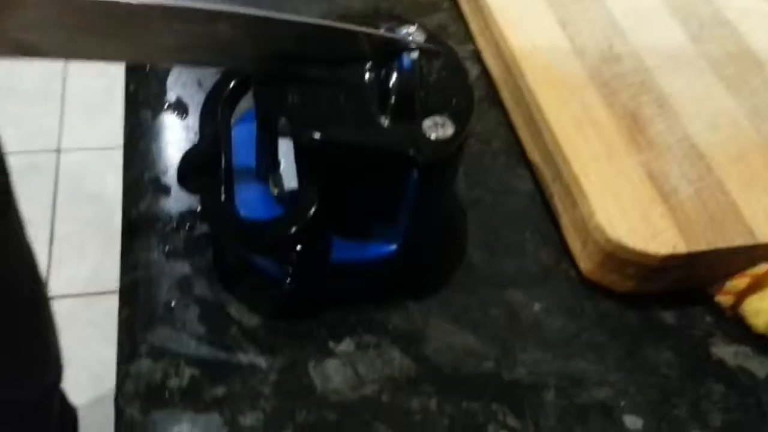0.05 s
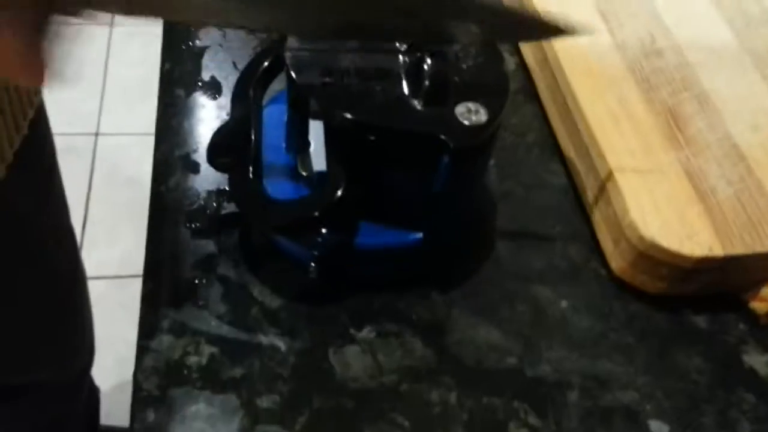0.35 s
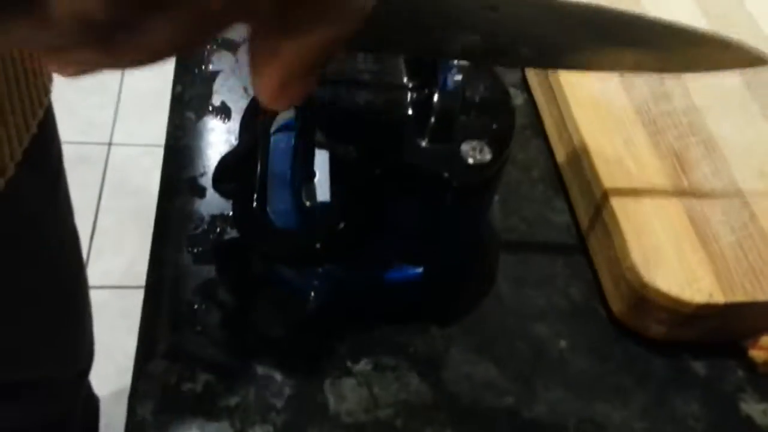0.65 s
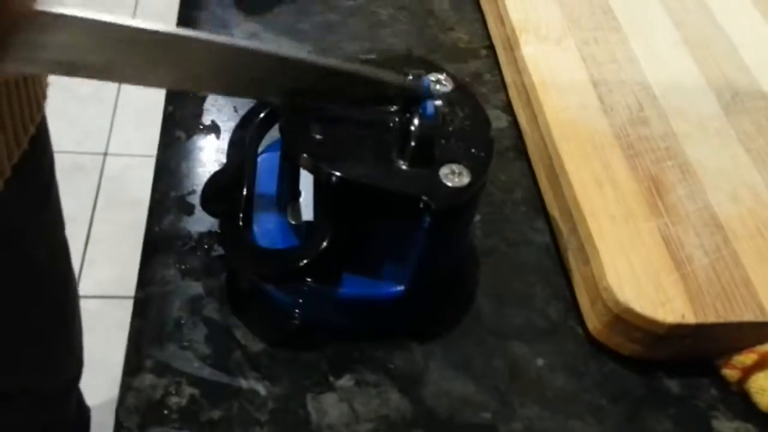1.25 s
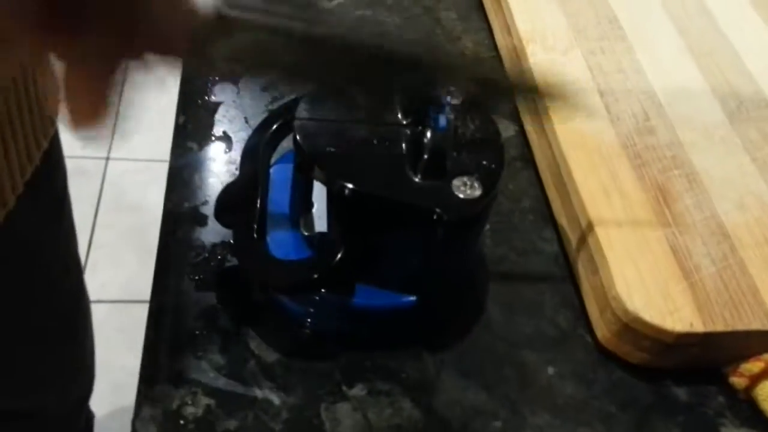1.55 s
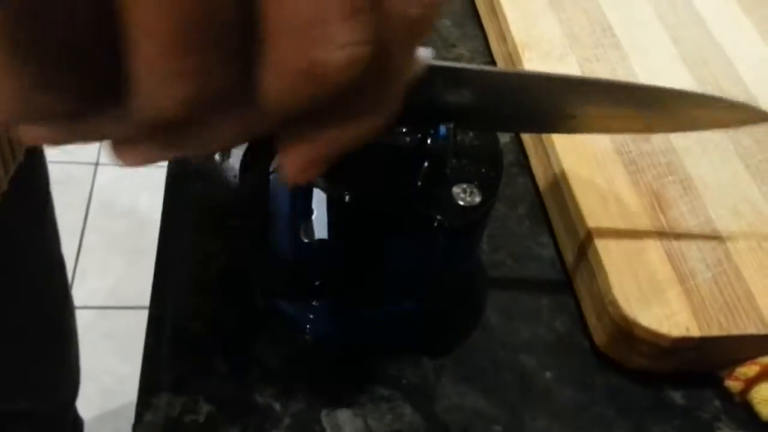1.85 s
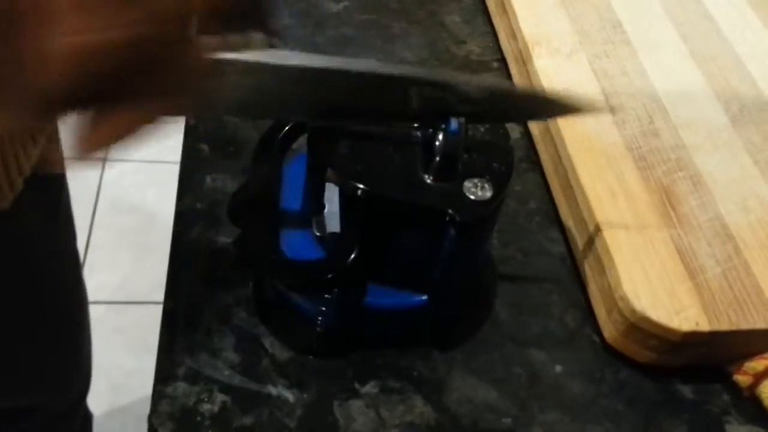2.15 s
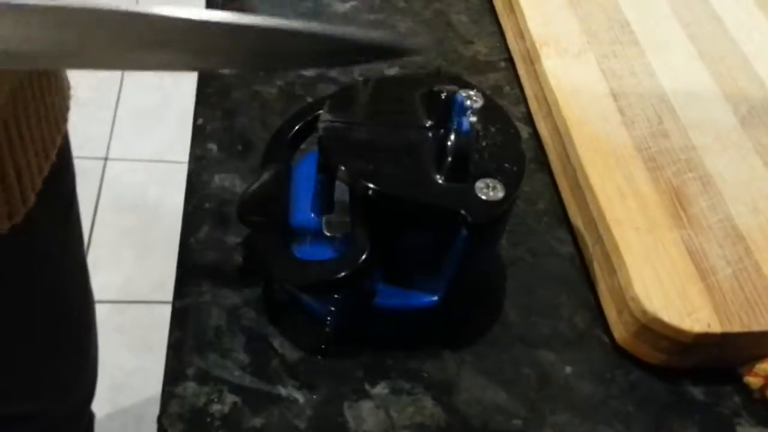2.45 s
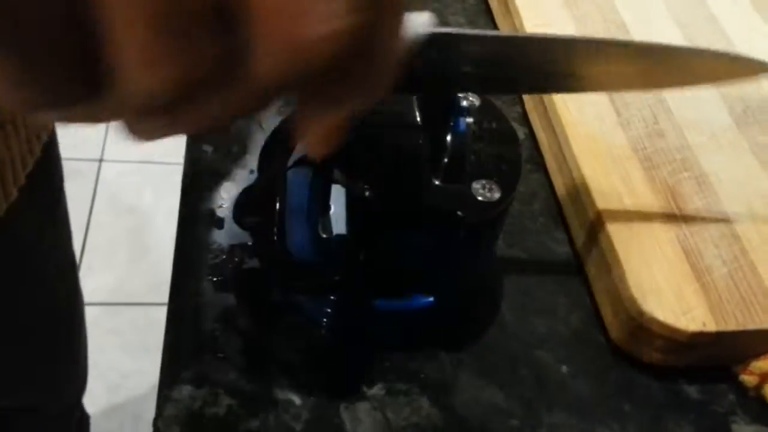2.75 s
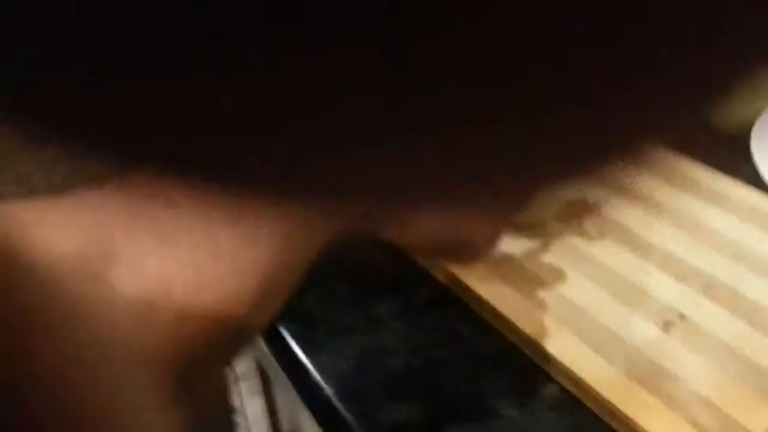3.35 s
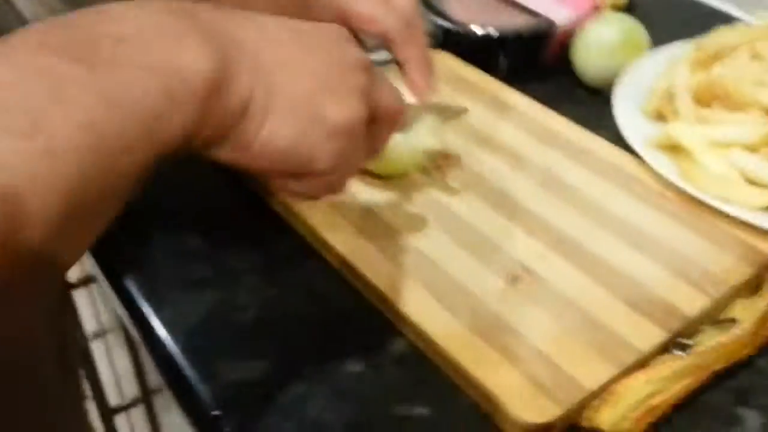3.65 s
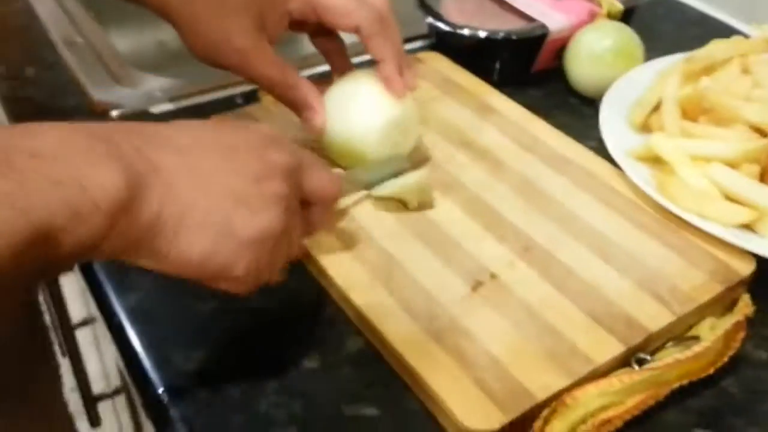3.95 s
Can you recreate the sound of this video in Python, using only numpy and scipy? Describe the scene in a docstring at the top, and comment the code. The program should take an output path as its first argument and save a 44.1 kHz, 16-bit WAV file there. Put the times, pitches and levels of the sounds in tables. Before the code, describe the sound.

Four rasping knife sharpener strokes with clicks and pings, followed by a short onion cut.

```python
"""In a small tiled kitchen, a knife is drawn four times through a sharpener on a stone counter.
Stick-slip friction of the gritty edge excites resonances of the hard teeth, plastic housing and blade;
between pulls the knife clicks into the slot, pings and slides lightly forward. Then it cuts an onion,
whose bursting cells crunch over the thud of a wooden board. The tiles reverberate over faint room noise."""
import sys
import numpy as np
from scipy import signal
from scipy.fft import rfft, irfft
from scipy.io import wavfile
from scipy.ndimage import uniform_filter1d, map_coordinates

SR = 44100
rng = np.random.default_rng(int(sys.argv[2]) if len(sys.argv) > 2 else 0)


def dump(signal):
    """Clip the signal to [-1, 1] and save it as 16-bit WAV at the path in sys.argv[1]."""
    limited = np.clip(np.atleast_2d(signal).T, -1, 1)
    pcm = np.round(limited * 32767).astype(np.int16)
    wavfile.write(sys.argv[1], SR, pcm)


N = 176400
TIME = np.arange(N) / SR


# Resonances of the three parts. Each row: frequency in Hz, width in Hz, relative level in dB.
TEETH_MODES = [(4965, 650, -3.5), (5390, 105, 2.5), (6260, 510, -0.5), (6510, 180, -1), (6770, 130, 3.5),
               (7200, 460, 1), (7800, 1100, -10), (8120, 73, -4.5), (8880, 590, -10), (10460, 1200, -15)]
HOUSING_MODES = [(105.6, 53, -18.5), (196, 41, -4.5), (408, 350, -12), (569, 134, -0.5), (730, 127, 3),
                 (905, 102, 4), (1095, 170, -1.5), (1263, 33, -4)]
BLADE_MODES = [(1580, 690, -0.5), (1880, 390, 0), (2220, 170, 2.5), (2480, 390, 0), (3015, 210, -1.5),
               (3630, 540, -6), (4205, 550, 3)]
# Band limits and mix of teeth, housing and blade. Each row: low and high filter cutoff in Hz, then in dB
# left minus right, room gain, rubbing gain, knock gain and the drop in force from belly to tip.
# The scraping hiss is filtered off steeply above about 11 kHz.
PART_MIX = [(4460, 10950, -20.5, -7.5, -0.5, 1, 7.5), (79, 2080, 0.5, -0.5, -3.5, 3.5, 0),
            (1220, 4030, 5.5, -0.5, -1.8, 0.5, 8.5)]
GRIT_PER_S, GRIT_SPREAD_DB, JUDDER_HZ, JUDDER_DB = 7000, 2, 330, 2.2

def sharpener():
    """Forced vibration: stick-slip friction and knocks drive the modes of teeth, housing and blade."""
    grit = grains(GRIT_PER_S, GRIT_SPREAD_DB)
    grit /= np.sqrt(uniform_filter1d(grit ** 2, size=1100) + 1e-9)  # the hand holds the pressure steady
    grit *= undb(JUDDER_DB * walk(JUDDER_HZ))  # the blade judders over the uneven edge
    cushion = signal.butter(2, 3450, fs=SR, output="sos")  # plastic softens knocks on housing and blade
    out = 0
    for part, modes in enumerate((TEETH_MODES, HOUSING_MODES, BLADE_MODES)):
        low_hz, high_hz, pan_db, room_db, rub_db, knock_db, tip_drop_db = PART_MIX[part]
        blows = knocks(part) if modes is TEETH_MODES else signal.sosfilt(cushion, knocks(part))
        force = undb(rub_db) * rubbing(part, tip_drop_db)
        ring = through(grit * force + undb(knock_db) * blows, body(modes, low_hz, high_hz))
        out += kitchen(ring + gliding_rasp(part, force), pan_db, room_db, NEAR_LAG_S)
    return out


# Hard pulls. Each row: times of start, full bite, belly of the blade and end in seconds, then levels
# of teeth, housing and blade in dB at the heel, and the same three at the belly.
HARD_PULLS = [(-.08, -0.001, 0.089, .13, -20.5, -20, -27.5, -18, -29, -31),
              (1.08, 1.135, 1.273, 1.349, -21.5, -20, -29.5, -18, -27.5, -25),
              (2.067, 2.157, 2.283, 2.296, -24.5, -25.5, -35.5, -15, -27.5, -21.5),
              (3.18, 3.213, 3.33, 3.368, -26, -21, -41, -17.5, -26.5, -20.5)]
# Light slides in the slot. Each row: start and end in seconds, levels of teeth, housing and blade
# in dB, level slope in dB per second.
LIGHT_SLIDES = [(0.127, 0.21, -30, -37.5, -40.5, -75), (0.318, 0.435, -46.5, -39.5, -45, -23),
                (0.44, 0.554, -42, -40, -50.5, 1), (0.613, 0.644, -52.5, -50.5, -60.5, 14),
                (0.683, 0.686, -49, -42.5, -50, -33), (0.796, .828, -37, -45.5, -38, 0),
                (0.888, 1.023, -42.5, -35, -49.5, 29.5), (1.39, 1.443, -34.5, -42, -45, -42),
                (1.703, 2.012, -36, -33.5, -43.5, -27.5), (2.319, 2.35, -25, -37, -37.5, -25),
                (2.382, 2.433, -47, -38.5, -45, -99), (2.672, 2.707, -54.5, -58, -60, -3),
                (2.71, 2.87, -43.5, -35.5, -50, -1), (3.044, 3.197, -52.5, -54, -55.5, -6),
                (3.4, 3.48, -35.5, -36, -40, -25)]
# Snags on burrs. Each row: time and length in seconds, gains of teeth, housing and blade in dB.
BURR_SNAGS = [(1.167, 0.019, 5, 3.5, 3.5), (1.356, 0.0095, 3.9, 1.5, -1), (3.216, 0.0069, 1.1, 5.5, 5),
              (3.247, 0.0092, 5.9, -3, 3), (3.354, 0.0078, 7, -5, 3.5), (3.367, .008, 4, -2, -12)]
BITE_DB, ATTACK_S, RELEASE_S = 20, 0.0013, 0.016

def rubbing(part, tip_drop_db):
    """Sliding friction follows contact force: a pull swells, bites and lets go; a slide is light."""
    def contact(start, end):
        return np.clip((TIME - start) / ATTACK_S, 0, 1) * np.exp(-np.maximum(TIME - end, 0) / RELEASE_S)

    force = np.zeros(N)
    for start, bite, belly, end, *db in HARD_PULLS:
        heel_db, belly_db = db[part::3]
        levels_db = [heel_db - BITE_DB, heel_db, belly_db, belly_db - tip_drop_db]
        force += contact(start, end) * undb(np.interp(TIME, [start, bite, belly, end], levels_db))
    for start, end, *db, slope in LIGHT_SLIDES:
        force += contact(start, end) * undb(db[part] + slope * np.clip(TIME - start, 0, end - start))
    for when, length_s, *db in BURR_SNAGS:
        force *= undb(db[part] * np.exp(-(2 * (TIME - when) / length_s) ** 2))
    return force


# One shifting resonance each for teeth, housing and blade. Each row: frequency at the heel and at the
# tip in Hz, width in Hz, level relative to the rest of the part in dB.
GLIDING_MODES = [(6210, 7100, 380, -8), (836, 918, 160, -5), (1955, 2300, 280, -8.5)]

def gliding_rasp(part, force):
    """A resonance shifts with the contact point: heel to tip in each pull, and back between pulls."""
    heel_hz, tip_hz, width_hz, db = GLIDING_MODES[part]
    turns = [when for start, _, _, end, *_ in HARD_PULLS for when in (start, end)]
    position = np.interp(TIME, turns, [0, 1] * len(HARD_PULLS))
    friction = force * grains(GRIT_PER_S, GRIT_SPREAD_DB)
    return undb(db) * moving_ring(friction, heel_hz + (tip_hz - heel_hz) * position, width_hz)


# Knocks of knife on sharpener. Each row: time in seconds, levels of teeth, housing and blade in dB.
KNIFE_KNOCKS = [(0.2738, -1, -10, -7), (.278, 1.5, -13, -6), (0.281, 4.5, -10, -1), (.286, 2, -7, -2),
                (.402, -13.5, -15, -5.5), (.762, -29, -30, -25.5), (0.776, -22.5, -53, -49),
                (0.8264, -1, -0.5, 3.5), (1.087, -14.5, -16.5, -19), (1.694, 1, -25, -22),
                (1.696, 2.5, -16, 4), (1.700, 0.5, -10, -6), (2.055, -21, -23, -40), (2.418, -9, -24, -7.5),
                (2.4264, 3.5, -28, -6.5), (2.705, -17.5, -8.5, -5.5), (3.003, 0, -11.5, -9),
                (3.076, -33, -15.5, -18.5)]
RATTLE_DECAY_S, RATTLE_GAIN = 0.0035, 0.96

def knocks(part, contrast=1):
    """Impact force: an impulse with a brief rattle behind it; contrast below 1 evens out the levels."""
    out, t = np.zeros(N), np.arange(SR // 50) / SR
    for when, *db in KNIFE_KNOCKS:
        blow = RATTLE_GAIN * unit(rng.standard_normal(len(t)) * np.exp(-t / RATTLE_DECAY_S))
        blow[0] += 1
        i = int(when * SR)
        out[i:i + len(t)] += undb(contrast * db[part]) * unit(blow)
    return out


def cracks():
    """A short impact has a wide spectrum: each knock on the teeth adds a crack in the high treble."""
    treble = body([(11030, 7000, 0)], low_hz=3000, high_hz=14500)
    crack = through(knocks(part=0, contrast=0.48), treble)
    return undb(-18) * kitchen(crack, pan_db=-3, room_db=-10, lag_s=NEAR_LAG_S)


# Landings of the knife in the slot. Each row: time in seconds, level in dB, decay time in seconds.
LANDINGS = [(.402, -35.5, 0.034), (0.828, -20.5, 0.0087), (1.694, -27.5, 0.06), (2.705, -36, 0.014)]
# Resonances of the slot. Each row: frequency in Hz, width in Hz, relative level in dB.
SLOT_MODES = [(960, 160, -1.5), (1140, 240, 3.7), (1460, 260, -4), (1806, 270, 0.74), (2180, 120, -3.2),
              (2600, 390, 0)]

def seating():
    """Damped rattling: the knife lands in the slot and judders to rest against its walls."""
    force = sum(undb(db) * (TIME >= when) * np.exp(-np.abs(TIME - when) / decay_s)
                for when, db, decay_s in LANDINGS)
    judder = through(grains(per_s=2500, spread_db=3) * force, body(SLOT_MODES, low_hz=600, high_hz=3530))
    return kitchen(judder, pan_db=-1, room_db=-1)


# Taps that set the steel ringing. Each row: time in seconds, level in dB.
BLADE_TAPS = [(0.283, -1.5), (0.828, -6), (1.696, -6), (2.425, -11), (3.003, -7)]
# Modes of the free blade. Each row: frequency in Hz, 60 dB decay time in seconds, relative level in dB.
FREE_BLADE_MODES = [(2290, 0.194, -7), (2424, 0.06, 5.5), (2490, 0.082, 6.5), (5030, 0.42, -14),
                    (5561, .14, -8), (5900, .15, -13), (7150, 0.065, -1)]

def pings():
    """Free vibration: after a tap the steel rings on as a sum of damped sinusoids."""
    t = np.arange(SR // 2) / SR
    ring = sum(undb(db) * np.sin(2 * np.pi * hz * t) * decay(t, t60) for hz, t60, db in FREE_BLADE_MODES)
    taps = sum(undb(db) * signal.unit_impulse(N, int(when * SR)) for when, db in BLADE_TAPS)
    return kitchen(through(taps, unit(ring)), pan_db=-4, room_db=-11)


# Course of the cut. Each row: time in seconds, relative levels of crunch and board in dB.
CUT_LEVELS = [(3.568, -61, -56), (3.609, -40.5, -46.5), (3.642, -46, -52), (3.724, -55.5, -54.5),
              (3.814, -45.5, -55), (3.85, -24, -39), (3.87, -22.5, -31), (3.916, -41, -35.5),
              (4.0, -24.5, -38)]
# Resonances of the crunch and the board. Each row: frequency in Hz, width in Hz, relative level in dB.
CRUNCH_MODES = [(1424, 560, -12.5), (2403.7, 730, -7.5), (3780, 230, -2), (4790, 1100, -1),
                (6400, 98, -0.5), (7000, 1100, -5), (10000, 3900, -16.5)]
BOARD_MODES = [(98, 66, -5), (152, 28, 3.5), (178.4, 8.3, 8), (221, 35, -10.5), (281, 120, -5),
               (530, 120, -11.5)]
CELLS_PER_S, CRUNCH_GAIN_DB, BOARD_GAIN_DB = 3100, 2.5, 0.5

def onion():
    """Fracture noise: cells burst under the blade while the board rumbles under the hand."""
    times, crunch_db, board_db = np.array(CUT_LEVELS).T
    flicker = undb(2.3 * walk(rate_hz=250))
    bursts = grains(CELLS_PER_S, spread_db=2) * flicker * curve(times, crunch_db + CRUNCH_GAIN_DB)
    crunch = through(bursts, body(CRUNCH_MODES, low_hz=506, high_hz=12900))
    board_force = grains(per_s=2500, spread_db=1.7) * curve(times, board_db + BOARD_GAIN_DB)
    rumble = through(board_force, body(BOARD_MODES, low_hz=70.5, high_hz=1070))
    return kitchen(crunch, pan_db=6, room_db=-2) + kitchen(rumble, pan_db=0.2, room_db=-6)


# Soft bumps on the board. Each row: time in seconds, level in dB, treble cutoff in Hz.
BOARD_BUMPS = [(3.59, -16, 1370), (3.697, -20, 110), (3.7386, -10, 600), (3.798, -18.5, 266)]
# Resonances of the bumped board. Each row: frequency in Hz, width in Hz, relative level in dB.
BUMP_MODES = [(106, 51, -9), (272, 131, 6), (530, 180, 0.5), (990, 390, 3)]

def bumps():
    """Contact softness limits bandwidth: the softer hand or onion meets the board, the duller the thud."""
    out = np.zeros(N)
    for when, db, high_hz in BOARD_BUMPS:
        blow = signal.unit_impulse(N, int(when * SR))
        out += undb(db) * through(blow, body(BUMP_MODES, low_hz=110, high_hz=high_hz))
    return kitchen(out, pan_db=0, room_db=-10)


# Spectrum of the room noise. Each row: frequency in Hz, relative spectral density in dB.
AIR_SPECTRUM = [(30, -18.5), (60, -8.5), (140, 2.5), (300, -6), (800, -23), (1500, -28), (7000, -25),
                (14200, -26.5), (15500, -66.5)]
AIR_DB, WHINE_HZ, WHINE_DB = -59.5, 3960, -74.5

def air():
    """Steady room noise with a thin whine; left and right are more coherent at long wavelengths."""
    f = np.fft.rfftfreq(N, 1 / SR) + 1
    hz, db = np.array(AIR_SPECTRUM).T
    mid, side = rfft(rng.standard_normal((2, N))) * undb(np.interp(np.log(f), np.log(hz), db))
    side *= np.minimum(0.27 + f / 1200, 1)
    noise = irfft(np.array([mid + side, mid - side]), N)
    whine = through(rng.standard_normal(N), body([(WHINE_HZ, 150, 0)], low_hz=3000, high_hz=5000))
    return undb(AIR_DB) * noise / noise.std() + undb(WHINE_DB) * whine


ROOM_T60_S, TREBLE_T60_S, ROOM_ONSET_S = 0.26, 0.25, 0.00033
NEAR_LAG_S = 0.0003  # the sharpener's direct sound reaches the left side first

def kitchen(x, pan_db, room_db, lag_s=0):
    """Reverberation: the tiles add a diffuse tail to the direct sound; its treble dies slightly sooner."""
    t = np.arange(SR * 3 // 4) / SR
    noise = rng.standard_normal((2, len(t)))
    low = signal.sosfilt(signal.butter(2, 3000, fs=SR, output="sos"), noise)
    tails = low * decay(t, ROOM_T60_S) + (noise - low) * decay(t, TREBLE_T60_S)
    tails = unit(tails * (1 - np.exp(-t / ROOM_ONSET_S)))
    delayed = np.pad(x, (int(lag_s * SR), 0))[:N]
    sides = unit(undb(np.array([pan_db, -pan_db]) / 2)) * np.sqrt(2)
    direct = np.array([x, delayed]) * sides[:, None]
    return direct + undb(room_db) * np.array([through(x, tail) for tail in tails])


def body(modes, low_hz, high_hz, size=8192):
    """Minimum-phase impulse response of a set of resonances, band-pass filtered between two cutoffs."""
    f = np.fft.rfftfreq(size, 1 / SR) + 1
    power = sum(undb(db) ** 2 / (1 + (2 * (f - hz) / width) ** 2) ** 1.26 for hz, width, db in modes)
    power = power / (1 + (low_hz / f) ** 6) / (1 + (f / high_hz) ** 16)
    cepstrum = irfft(np.log(power + 1e-14) / 2)
    cepstrum[1:size // 2] *= 2  # folding the cepstrum makes the ring causal
    cepstrum[size // 2 + 1:] = 0
    return unit(irfft(np.exp(rfft(cepstrum))))


def moving_ring(x, hz, width_hz):
    """Heterodyne resonator: shift down by a moving centre frequency, low-pass, and shift back."""
    carrier = np.exp(2j * np.pi * np.cumsum(hz) / SR)
    pole = np.exp(-np.pi * width_hz / SR)
    loss = 1 - pole ** 2
    gain = loss * np.sqrt(2 * loss / (1 + pole ** 2))  # white noise keeps its level
    return np.real(carrier * signal.lfilter([gain], [1, -2 * pole, pole ** 2], (x + 1e-18) / carrier))


def grains(per_s, spread_db):
    """Shot noise: tiny random impacts of unequal size, at an rms of 1."""
    impacts = (rng.random(N) < per_s / SR) * rng.choice([-1, 1], N)
    impacts = impacts * undb(spread_db * np.minimum(rng.exponential(size=N), 5))
    return impacts / impacts.std()


def walk(rate_hz):
    """Smooth random modulation with a spread near 1."""
    return map_coordinates(rng.standard_normal(N), [TIME * rate_hz], order=3, mode="mirror")


def curve(times, db):
    """Amplitude envelope along a level curve, silent outside it."""
    return uniform_filter1d(undb(np.interp(TIME, times, db, left=-120, right=-120)), size=64)


def decay(t, t60):
    """Exponential damping by 60 dB in t60 seconds."""
    return np.exp(-np.log(1000) * t / t60)


def through(x, response):
    """Convolution with an impulse response."""
    return signal.fftconvolve(x, response)[:N]


def unit(x):
    """Normalisation to unit energy."""
    return x / np.sqrt(np.sum(x ** 2, axis=-1, keepdims=True))


def undb(db):
    """Decibels to amplitude ratio."""
    return 10 ** (np.asarray(db) / 20)


def scene():
    """Superposition: sharpening, then cutting, over the quiet of the kitchen."""
    return sharpener() + cracks() + seating() + pings() + onion() + bumps() + air()


def record(dry):
    """Hard clipping just under full scale, then a steep low-pass at 15.3 kHz."""
    return signal.sosfilt(signal.ellip(8, .2, 80, 15300, fs=SR, output="sos"), np.clip(dry, -.9, .9))


dry = scene()
out = record(dry)
dump(out)
```